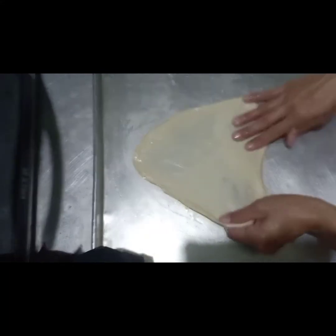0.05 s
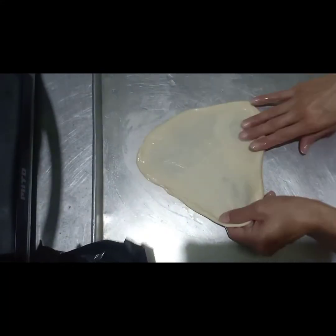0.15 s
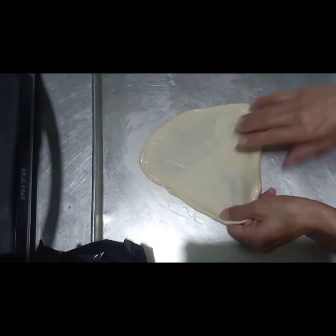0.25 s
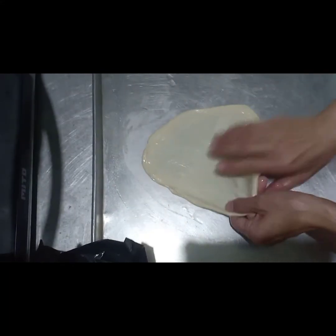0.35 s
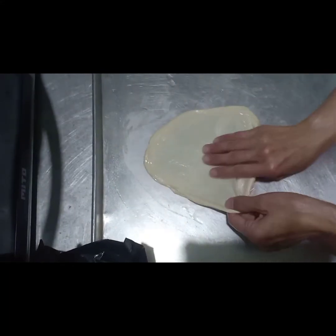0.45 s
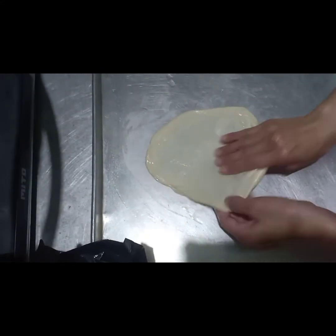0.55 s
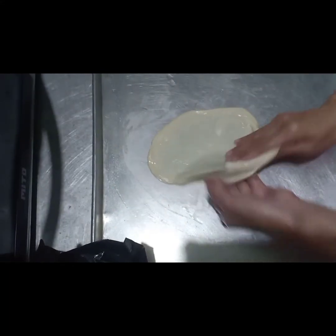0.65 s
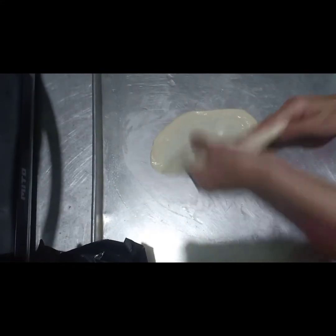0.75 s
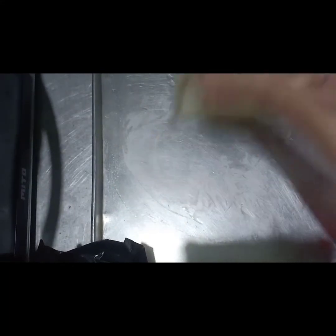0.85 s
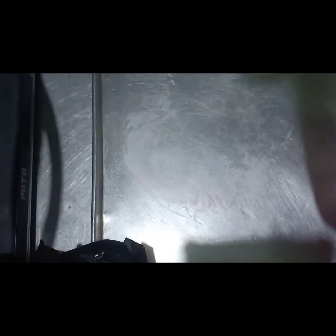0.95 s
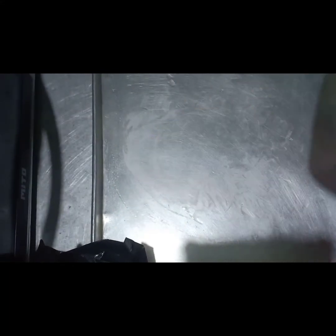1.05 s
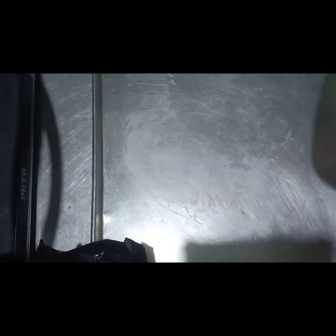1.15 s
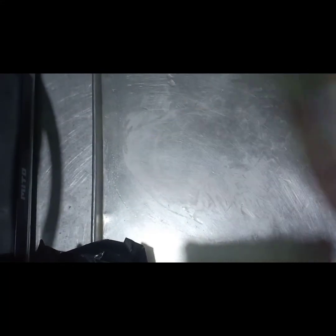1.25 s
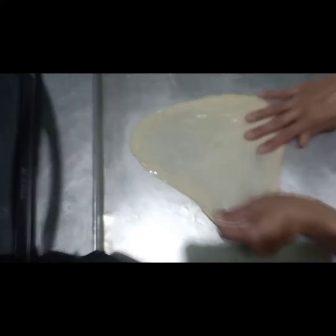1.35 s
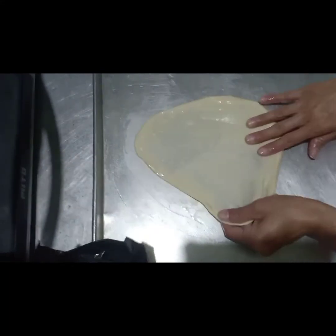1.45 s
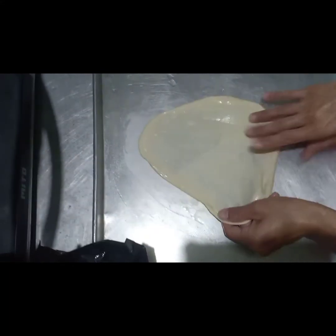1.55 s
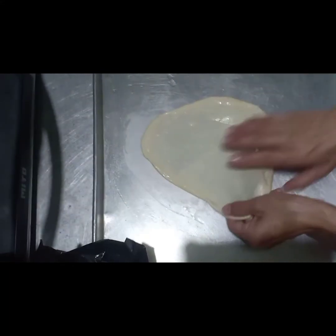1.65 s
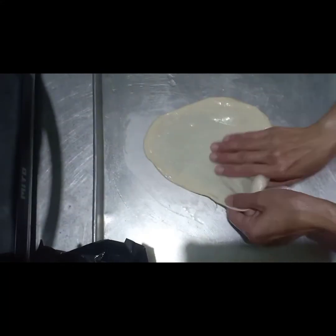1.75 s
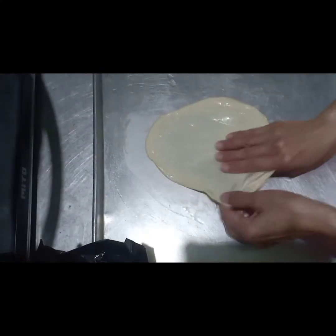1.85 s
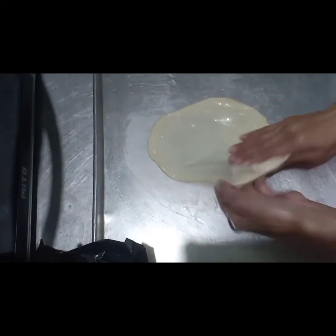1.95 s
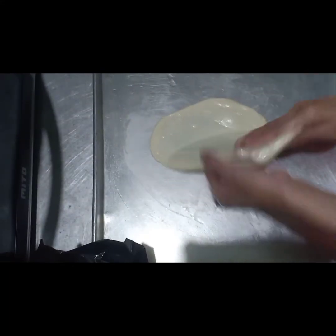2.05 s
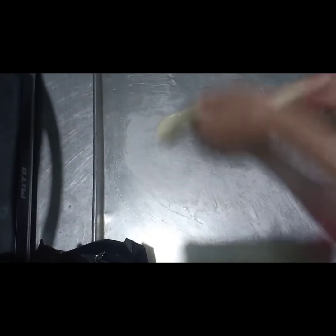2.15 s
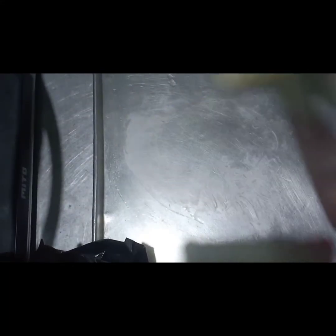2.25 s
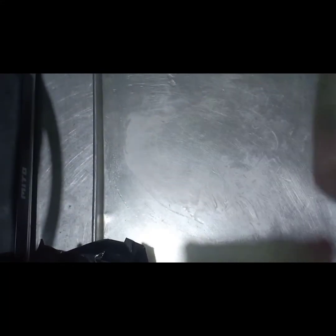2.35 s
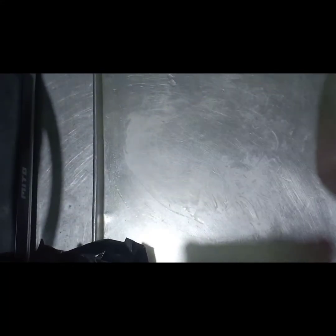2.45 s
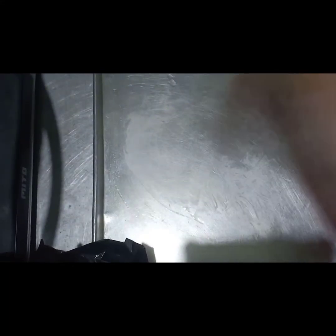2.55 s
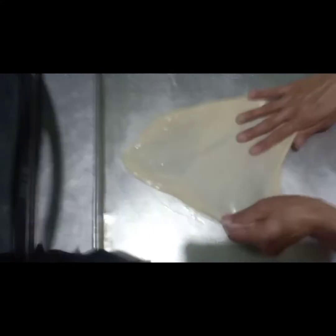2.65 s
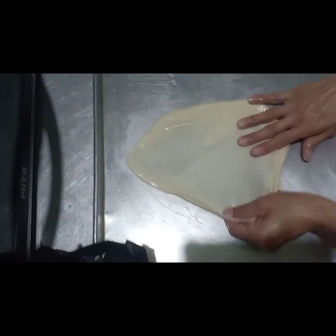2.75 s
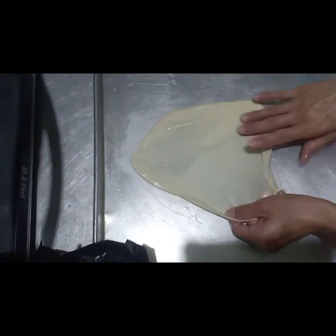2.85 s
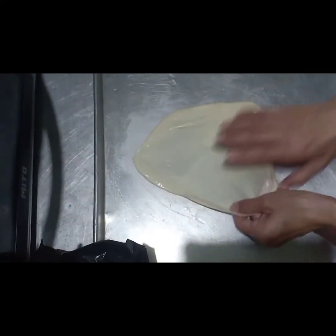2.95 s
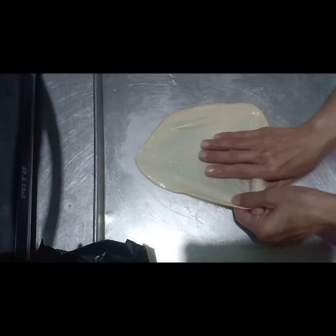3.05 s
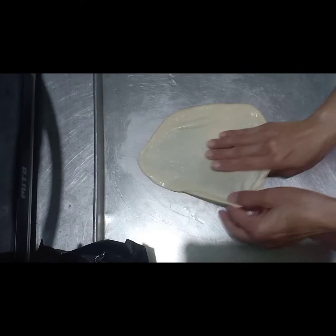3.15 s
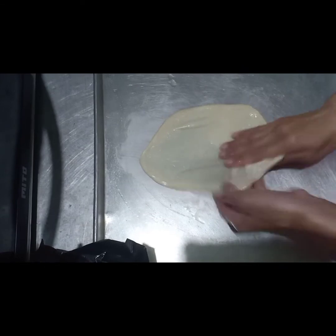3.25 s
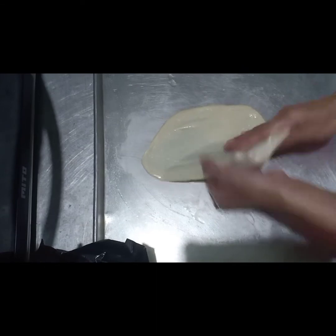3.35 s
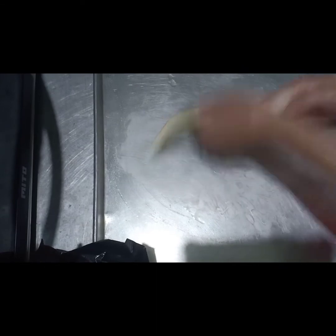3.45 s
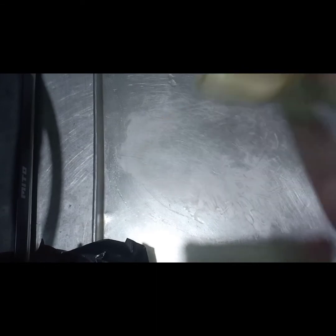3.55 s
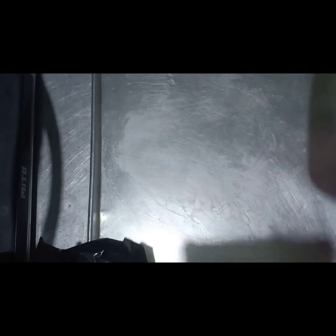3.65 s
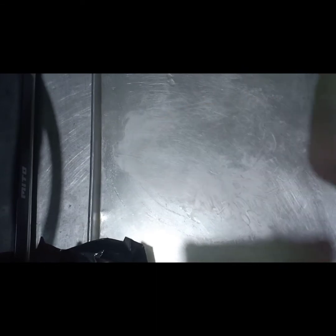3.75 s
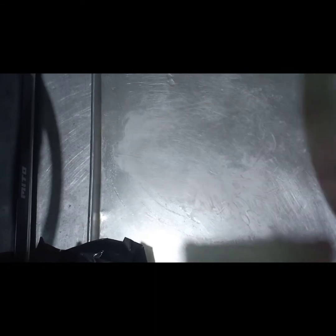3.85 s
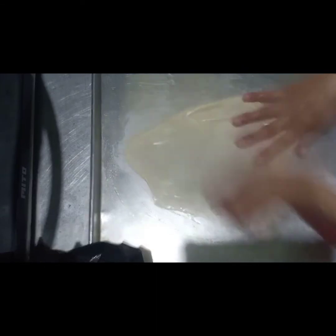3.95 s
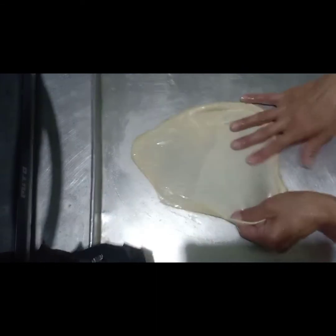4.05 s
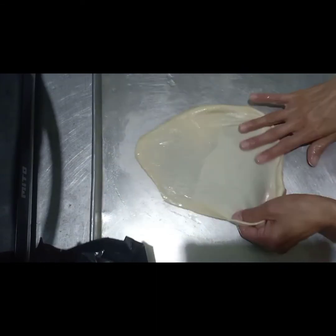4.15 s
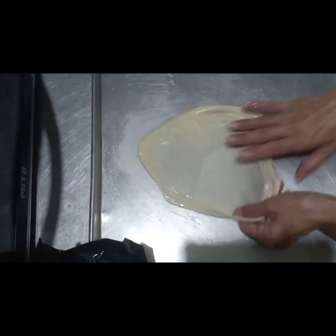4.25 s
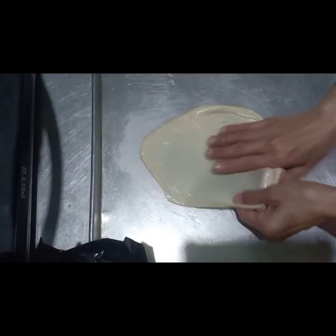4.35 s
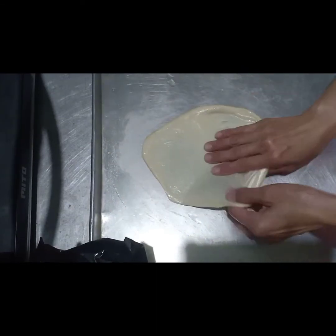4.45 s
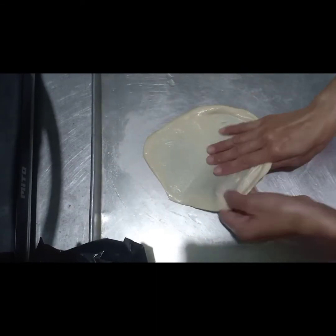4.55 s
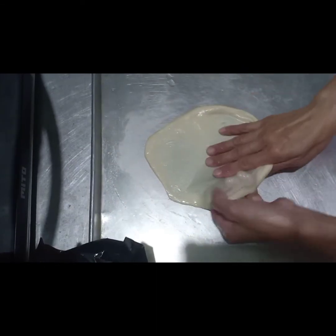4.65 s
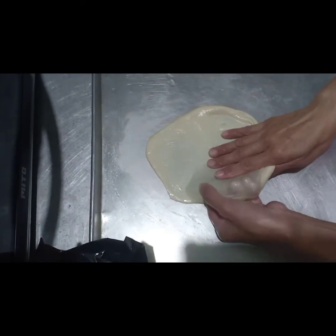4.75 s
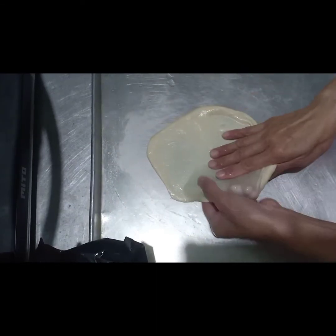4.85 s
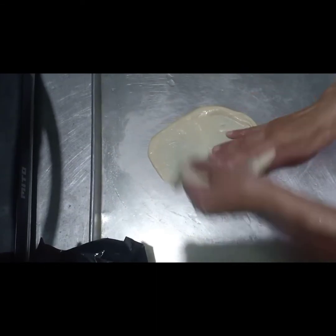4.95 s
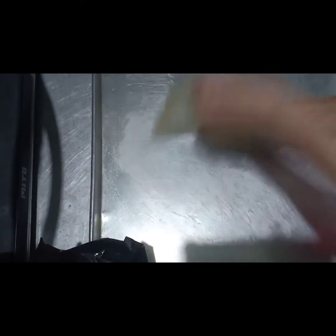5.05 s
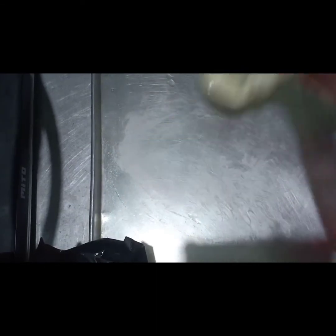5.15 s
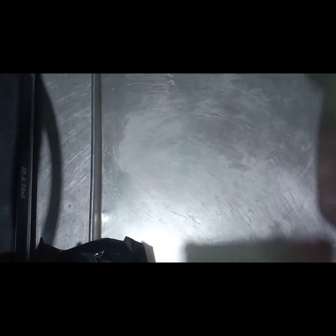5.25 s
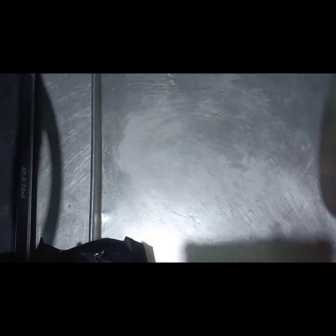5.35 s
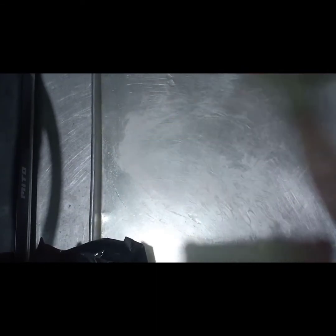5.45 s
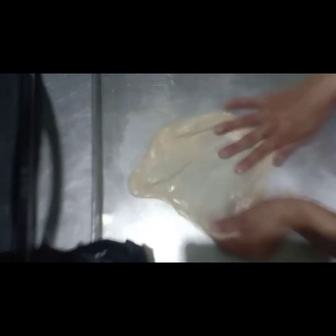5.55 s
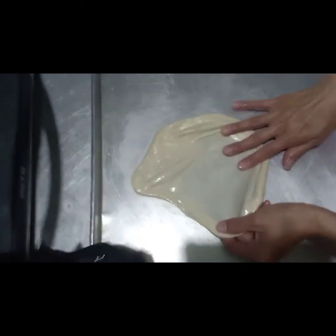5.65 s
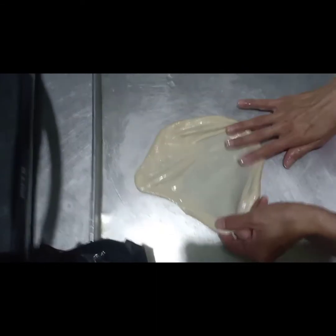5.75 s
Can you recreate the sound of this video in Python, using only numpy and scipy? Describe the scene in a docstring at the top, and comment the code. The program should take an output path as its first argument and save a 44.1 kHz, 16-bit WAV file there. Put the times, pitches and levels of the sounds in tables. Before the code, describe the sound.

Faint sticky ticks over soft fan noise, then a loud wet dough slap on sheet metal, repeated at an even, unhurried pace for five slaps. Soft pats and oily peeling fill the gaps; after the third slap comes a muffled bump and light metallic clink, then three barely audible hollow pips before and around more pats. Close, wide stereo pickup, slightly flattened peaks, short bright kitchen reverberation.

```python
"""Sticky ticks over fan hiss and hum, then an oiled dough sheet slapped five times on a steel table.
Each slap is patches of dough landing milliseconds apart, each a burst of tiny smacks; the table booms.
Between slaps come soft pats and peeling, more ticks, a dull knock, a ringing clink and hollow pips.
A small hard kitchen adds sparse early echoes and a diffuse tail; two spaced microphones overload on peaks."""
import sys
import numpy as np
from scipy import signal
from scipy.fft import rfft, irfft, next_fast_len
from scipy.io import wavfile

SR = 44100
rng = np.random.default_rng(int(sys.argv[2]) if len(sys.argv) > 2 else 0)


def rack_gain(trim_db):
    """Turn a fader trim in dB into the linear factor to multiply a signal by."""
    fader = np.asarray(trim_db, float)
    return 10 ** (fader / 20)


def unload_wav(signal):
    """Save mono or channel-first audio to the path in sys.argv[1] as 16-bit WAV at rate SR, clipped to [-1, 1]."""
    wavfile.write(
        sys.argv[1],
        SR,
        np.round(np.clip(np.atleast_2d(signal).T, -1, 1) * 32767).astype(np.int16),
    )


N = 255338   # samples

# Patches of dough landing. Each row: start in seconds, 1.5-3.5 kHz level in dB, then in dB against it:
# thud 100-600 Hz, body 600-1500 Hz, sheen 3.5-8 kHz.
SLAP_PATCHES = [(0.1205, -19, -8, -10, -14), (0.1323, -9.5, -21.5, -8, -7), (0.1387, -1.5, -15.5, -7, -1.5),
                (0.2363, -18, -20, -18, -9), (1.4383, -22, -9, 5, -14), (1.443, -1.5, -12.5, -10, -13.5),
                (1.4483, -11.5, -17, 0, -11.5), (1.4515, -9.5, -15.5, -3, -1),
                (1.4593, -13.5, -15.5, -7, -17), (2.7485, -23, -12.5, -4, -17),
                (2.7578, 1.5, -24.5, -3, -10), (2.7667, -11, -14.5, 0.5, -13), (2.7719, -9.5, -24, 4, -18),
                (2.787, -13.5, -7.5, -2.5, -20), (2.836, -21.5, -9, 0.5, -15),
                (4.0833, -19.5, -3.5, -9, -4), (4.0872, -14.5, -14, 1.5, 0), (4.0954, -4, -11.5, -6, -7.5),
                (4.1008, -15, -7, -7, -13), (5.7013, -15.5, -5, 4.5, -10), (5.7111, -1.5, -32.5, -4, -7),
                (5.7201, -13, -7.5, -12, -19)]
# Colour of a wet contact, for slaps and pats. Each row: frequency in Hz, density in dB per Hz.
WET_COLOUR = [(40, -27.5), (65, -24.5), (118, -1.5), (417, 2), (800, -0.5), (965, -1), (1200, 5), (1500, 2),
              (2200, 4), (2850, 3.5), (3400, -7), (4500, -9), (5300, -6), (6400, -15.5), (8500, -29),
              (12700, -32.5), (14900, -26.5), (16000, -51)]


def slaps():
    """Dough patches hit the table; the harder a patch lands, the shorter its contact."""
    ms_at_0_db, halving_db = 1.14, 13
    rows = []
    for s, level_db, *others_db in SLAP_PATCHES:
        contact_ms = ms_at_0_db * 2 ** (-level_db / halving_db)
        rows.append((s, level_db, *others_db, contact_ms))
    return contacts(rows, WET_COLOUR, grain_db=1.5, rise=0.086)


# Fingers patting and peeling. Each row: start in seconds, 1.5-3.5 kHz level in dB, then in dB against it:
# thud, body, sheen.
FINGER_PATS = [(0.4943, -47, 2.5, 0, -1), (0.5594, -40.5, -19, -9, -14.5), (0.6508, -34, -6.5, -8, -16),
               (1.1094, -44.5, -13, -28, -10), (1.1184, -37, -19, -30, -6), (1.7786, -43, 3.5, -5.5, -16),
               (1.7976, -46, -16, -6, -11), (1.8849, -43, -22, -6, -18), (1.9868, -34, -4, -7.5, -10.5),
               (2.2417, -43, -29, -19, -2), (3.2106, -47, -24.5, -5.5, -27), (3.299, -39, -6.5, -7, -19),
               (3.4775, -51, -19, 10, -12), (3.5203, -40, -22.5, -40.5, -16),
               (4.4795, -34, -12.5, -17.5, -11), (4.6178, -33, -9, -6, -13)]


def pats():
    """Fingers touch the dough, every contact equally long."""
    contact_ms = 5
    rows = [(*row, contact_ms) for row in FINGER_PATS]
    return contacts(rows, WET_COLOUR, grain_db=10.5, rise=0.12)


# Steel table top modes. Each row: frequency in Hz, level in dB, t60 in seconds.
TABLE_MODES = [(80, -37, 0.45), (114.6, -42, 0.15), (142.5, -46.5, 0.23), (220.3, -49.5, 0.2),
               (290.6, -43, 0.076), (442, -45.5, 0.025), (978.3, -32.5, 0.044), (1087, -36, 0.022),
               (2341, -40.5, 0.033)]


def table(force):
    """The sheet-steel top booms and rings, each mode driven by the force."""
    return sum(rack_gain(db) * ring(force, hz, t60_s) for hz, db, t60_s in TABLE_MODES)


# The oily sheet letting go. Each row: start in seconds, 3.5-8 kHz level in dB, 1.5-3.5 kHz in dB against it.
STICKY_TICKS = [(0.0016, -30, -17), (0.0084, -45.5, -12), (0.018, -37, -6), (0.0293, -30.5, -15),
                (0.044, -38.5, -4), (0.8657, -33, -5), (1.153, -40, -12), (1.182, -39, -22),
                (1.2976, -43.5, -2), (1.321, -40, -3), (1.3278, -28.5, -12), (1.3354, -38, -18),
                (1.3462, -36, -14), (1.365, -43, -10), (2.077, -47, -3), (4.906, -37.5, -5)]
# Colour of a tick. Each row: frequency in Hz, density in dB per Hz.
TICK_COLOUR = [(60, -40), (200, 1.5), (1000, -25), (2500, -14), (4200, -6.5), (5300, 6.5), (6300, -0.5),
               (8000, -24), (12000, -25), (16000, -33)]


def ticks():
    """Bright sticky ticks share one contact time and one faint low end."""
    contact_ms = 3.4
    thud_db, body_db = -9.5, -19.5   # against 1.5-3.5 kHz
    rows = [(s, sheen_db + below_db, thud_db, body_db, -below_db, contact_ms)
            for s, sheen_db, below_db in STICKY_TICKS]
    return contacts(rows, TICK_COLOUR, grain_db=6.5, rise=0.069)


# Bumps of a dull knock. Each row: start in seconds, 100-600 Hz level in dB, 1.5-3.5 kHz in dB against it.
KNOCK_BUMPS = [(3.792, -40.5, -10.5), (3.8106, -33, -9.5), (3.8242, -35.5, -9), (3.8328, -33, -29),
               (3.8557, -36, -21)]
# Colour of a bump. Each row: frequency in Hz, density in dB per Hz.
KNOCK_COLOUR = [(60, -32), (130, -12), (170, 0.5), (850, -4.5), (1150, -15), (2400, 11), (3400, -21),
                (5200, -27), (8000, -51), (16000, -54.5)]


def knocks():
    """The bumps share one contact time; the rattle on top weakens from bump to bump."""
    contact_ms = 8.1
    body_db = -3   # against the thud
    sheen_db, sheen_loss_db_per_s = 12.5, 700   # against 1.5-3.5 kHz
    first_s = KNOCK_BUMPS[0][0]
    rows = []
    for s, thud_db, above_db in KNOCK_BUMPS:
        bump_sheen_db = sheen_db - sheen_loss_db_per_s * (s - first_s)
        rows.append((s, thud_db + above_db, -above_db, body_db - above_db, bump_sheen_db, contact_ms))
    return contacts(rows, KNOCK_COLOUR, grain_db=9.5, rise=0.185)


SPOTS = 5   # places on the table
# Bands in the order of a contact row. Each row: low edge in Hz, high edge in Hz.
BANDS = [(1500, 3500), (100, 600), (600, 1500), (3500, 8000)]


def contacts(rows, colour, grain_db, rise):
    """Each touch is a crowd of tiny uneven smacks that swells and thins out over its contact time.
    Rows: start in seconds, dB in the first band, dB of the other three against it, contact in ms.
    Returns the smacks, and their energy as single blows for the diffuse tail, both by spot."""
    size = 4096
    hz = np.fft.rfftfreq(size, 1 / SR)
    t = np.arange(1, size + 1) / SR
    out = np.zeros((2, SPOTS, N + 2 * size))
    crisp_hz, crisp_db = 12000, 0.5   # treble gained per halving of the contact
    colour_db = at_hz(colour, hz)
    centres = [np.sqrt(low * high) for low, high in BANDS]
    band_db = [10 * np.log10(np.sum(rack_gain(2 * colour_db[(hz > low) & (hz < high)])) / len(hz))
               for low, high in BANDS]
    shape = (len(rows), size)
    sizes = rack_gain(grain_db * np.minimum(rng.exponential(1, shape), 4)) * rng.choice([-1, 1], shape)
    for k, ((s, level_db, *others_db, ms), grains) in enumerate(zip(rows, sizes)):
        spot = k % SPOTS
        length_s = max(ms, .3) / 1000
        swell = 1 - np.exp(-t / (max(rise, .01) * length_s))
        outline = np.exp(-t / length_s) * swell
        burst = grains * outline
        energy_db = 10 * np.log10(np.sum(outline ** 2))   # the same however the smacks fall
        wanted_db = level_db + np.array([0, *others_db]) - band_db
        crisp = (crisp_hz, wanted_db[-1] - crisp_db * np.log2(length_s / 0.0044))
        tilt_db = at_hz([*sorted(zip(centres, wanted_db)), crisp], hz)
        blow_db = colour_db + tilt_db + energy_db
        smacks = signal.fftconvolve(burst, causal_filter(blow_db - broad_db(burst)))
        at = round(s * SR)
        out[0, spot, at:at + 2 * size - 1] += smacks
        late = at + round(length_s * SR)   # about the centre of the contact
        out[1, spot, late:late + size] += causal_filter(blow_db)
    return out[..., :N]


def causal_filter(spectrum_db):
    """Minimum-phase response for a magnitude in dB, so nothing sounds before the touch."""
    cepstrum = irfft(spectrum_db * np.log(10) / 20)
    half = len(cepstrum) // 2
    cepstrum[1:half] *= 2
    cepstrum[half + 1:] = 0
    return irfft(np.exp(rfft(cepstrum)))


def broad_db(x):
    """Level of a short sound against frequency, averaged over about a quarter octave."""
    total = np.cumsum(np.abs(rfft(x)) ** 2)
    k = np.arange(len(total))
    low = (k / 1.08).astype(int)
    high = np.minimum((k * 1.08).astype(int) + 3, len(k) - 1)
    return 10 * np.log10((total[high] - total[low]) / np.maximum(high - low, 1) + 1e-12)


def at_hz(points, hz):
    """Read a (Hz, value) table on a log-frequency axis."""
    points = np.array(points)
    return np.interp(np.log(np.maximum(hz, 1)), np.log(points[:, 0]), points[:, 1])


# Clink modes. Each row: frequency in Hz, level in dB, t60 in seconds.
CLINK_MODES = [(2170, -1, .04), (2560, 11, 0.099), (3080, 8, 0.031), (4000, 5, 0.03), (4500, -3, .04),
               (5000, 1, 0.046), (5100, 5.5, 0.078), (6140, -14, 0.075)]


def clink():
    """A light metal thing is knocked: a brief noisy rattle drives each ringing mode."""
    start_s, gain_db = 3.938, -47.5
    t = np.arange(400) / SR
    rattles = rng.standard_normal((len(CLINK_MODES), 400)) * np.exp(-t / 0.0081)
    out = 0
    for (hz, db, t60_s), rattle in zip(CLINK_MODES, rattles):
        force = np.convolve(strike(start_s, rack_gain(gain_db + db)), 0.12 * rattle)[:N]
        out = out + ring(force, hz, t60_s)
    return out


# Faint hollow pips. Each row: start in seconds, level in dB.
PIP_BLOWS = [(4.375, -51.5), (4.448, -49), (4.559, -50.5)]


def pips():
    """A small hollow thing ticks; a click rung twice swells softly."""
    hz, t60_s = 734, 0.11
    pip = ring(ring(strike(0, 1), hz, t60_s), hz, 0.026)
    blows = sum(strike(s, rack_gain(db)) for s, db in PIP_BLOWS)
    return ring(ring(blows, hz, t60_s), hz, 0.019) / np.max(pip)


def strike(s, level):
    """One click at a moment in seconds."""
    blow = np.zeros(N)
    blow[round(s * SR)] = level
    return blow


def ring(force, hz, t60_s):
    """Two-pole resonator: a unit click sets a sine of height 1 ringing."""
    r = rack_gain(-60 / (t60_s * SR))
    w = 2 * np.pi * hz / SR
    return signal.lfilter([0, np.sin(w)], [1, -2 * r * np.cos(w), r * r], force + 1e-18)


# Kitchen reverberation. Each row: frequency in Hz, t60 in seconds.
ROOM_T60 = [(80, 0.97), (210, 0.42), (560, 0.66), (1470, 0.35), (3880, 0.61), (10200, 0.3)]
# Walls and air take the treble of the echoes. Each row: frequency in Hz, level in dB.
TAIL_COLOUR = [(5000, -0.5), (9000, -1)]


def kitchen():
    """Echo patterns from one spot to both microphones: direct sound with sparse near reflections,
    and a tail dying band by band."""
    early_db, early_t60_s = 4.5, 0.074   # reflections against the direct sound
    late_db, flutter_db, flutter_ms = -2, 1.5, 3.1
    size = 32768
    t = np.arange(size) / SR
    sparse = rng.standard_normal((2, size)) * (rng.random((2, size)) < 900 / SR)   # about 900 per second
    early = sparse * rack_gain(-60 * t / early_t60_s) * (t > .0006)
    low, high = (signal.butter(2, 600, kind, fs=SR, output="sos") for kind in ("low", "high"))
    shared_bass = signal.sosfilt(low, early.sum(axis=0)) / np.sqrt(2)   # long waves reach both alike
    early = signal.sosfilt(high, early) + shared_bass
    hz, diffuse = stereo_noise(size)
    octaves = np.log2(np.maximum(hz, 1) / 40)
    late = 0
    for k in range(10):   # overlapping octave bands that add up to a flat spectrum
        band = irfft(diffuse * np.clip(1 - np.abs(octaves - k), 0, 1))
        late = late + band * rack_gain(-60 * t / at_hz(ROOM_T60, 40 * 2 ** k))
    late = late * (1 - np.exp(-t / 0.00736))   # the tail builds up
    clumps = np.interp(1000 * t / flutter_ms, np.arange(500), rng.standard_normal(500))
    late = late * rack_gain(flutter_db * clumps)   # parallel hard walls bunch the echoes
    early = rack_gain(early_db) * early / np.sqrt(np.sum(early ** 2) / 2)
    early[[0, 1], rng.integers(0, 6, 2)] += 1   # direct sound, 0-5 samples late at each microphone
    return with_colour(early, 2.8), with_colour(late, late_db + at_hz(TAIL_COLOUR, hz))


def with_colour(echoes, level_db):
    """Many reflections average out: the broad spectrum of each pattern follows the given level."""
    return np.array([signal.fftconvolve(e, causal_filter(level_db - broad_db(e)))[:len(e)]
                     for e in echoes])


# Likeness of the two microphones. Each row: frequency in Hz, left-right correlation from -1 to 1.
MIC_LIKENESS = [(60, 0.97), (180, 0.9), (550, 0.66), (1650, -0.21), (4970, -0.0), (15000, 0.026)]


def stereo_noise(size):
    """Spectra of a diffuse field at two spaced microphones: alike in the bass, nearly unrelated above."""
    hz = np.fft.rfftfreq(size, 1 / SR)
    mid, side = rfft(rng.standard_normal((2, size)))
    alike = np.clip(at_hz(MIC_LIKENESS, hz), -.99, .99)
    return hz, np.sqrt((1 + alike) / 2) * mid + np.sqrt((1 - alike) / 2) * side * [[1], [-1]]


# Colour of the steady air noise. Each row: frequency in Hz, density in dB per Hz.
AIR_COLOUR = [(20, -49), (45, -22.5), (66, -14.5), (85, -2.5), (250, -10), (450, -7.5), (800, -10.5),
              (1300, -14.5), (2300, -7), (2900, -9.5), (3700, -16), (5400, -10.5), (6600, -19.5),
              (8000, -28.5), (10000, -33), (16000, -31.5)]
# Air noise above 1 kHz. Each row: time in seconds, rms level in dB.
HISS_LEVEL = [(0, -52.5), (.4, -50.5), (.75, -54), (1.3, -52.5), (1.75, -51.5), (2.1, -53.5), (2.7, -53.5),
              (3.15, -56), (3.7, -56.5), (4.4, -54.5), (4.8, -56), (5.79, -55.5)]
# Blurred hum tones. Each row: frequency in Hz, width in Hz, rms level in dB.
HUM_TONES = [(80, 23, -66), (123, 20, -68.5), (226.6, 24, -71.5), (343, 14.8, -75), (469, 40, -72.5)]


def air():
    """Fan hiss and rumble from shaped noise, with blurred hum tones; bass and treble swell together."""
    rumble_db, rumble_follows = -60.5, 0.93   # level below 1 kHz; its share of the hiss swing
    size = next_fast_len(N)
    hz, diffuse = stereo_noise(size)
    noise = diffuse * rack_gain(at_hz(AIR_COLOUR, hz))
    s, high_db = np.transpose(HISS_LEVEL)
    low_db = rumble_db + rumble_follows * (high_db - high_db.mean())
    out = 0
    for db, part in ((low_db, hz < 1000), (high_db, hz >= 1000)):
        swell = rack_gain(np.interp(np.arange(N) / SR, s, db))
        out = out + swell * rms_one(irfft(noise * part, size)[:, :N])
    hz, diffuse = stereo_noise(size)
    for hum_hz, width_hz, db in HUM_TONES:
        resonance = 1 / (1 + (2 * (hz - hum_hz) / width_hz) ** 2)
        out = out + rack_gain(db) * rms_one(irfft(diffuse * resonance, size)[:, :N])
    return out


def rms_one(x):
    """Scale to rms 1."""
    return x / np.sqrt(np.mean(x ** 2) + 1e-20)


def scene():
    """Slaps and pats also ring the table; each spot has its own echoes in the kitchen, over the air noise."""
    near = slaps() + pats()   # [smacks or blows, spot, sample]
    near[0] += table(near[0])
    near += ticks() + knocks()
    near[:, 0] += clink() + pips()
    out = air()
    for smacks, blows in near.transpose(1, 0, 2):
        early, late = kitchen()
        direct = signal.fftconvolve(smacks[None], early, axes=1)
        tail = signal.fftconvolve(blows[None], late, axes=1)
        out += rack_gain(-1.5) * (direct + tail)[:, :N]
    return out


def top_cut(x):
    """Nothing passes above the cut-off."""
    return signal.sosfilt(signal.butter(12, 16480, fs=SR, output="sos"), x)


def record(dry):
    """The loudest peaks flatten against the overload limit."""
    limit = .96   # of full scale
    mix = dry / (1 + np.abs(dry / limit) ** 6) ** (1 / 6)
    return top_cut(mix)


dry = scene()
out = record(dry)
unload_wav(out)
```